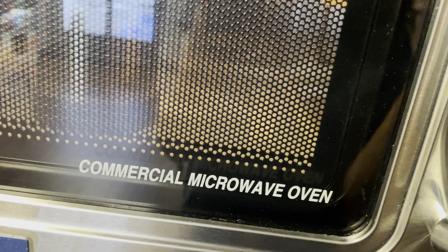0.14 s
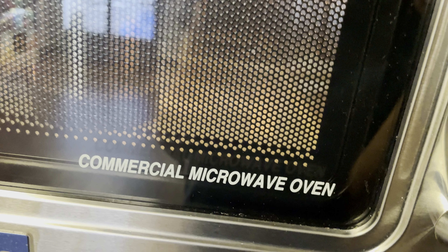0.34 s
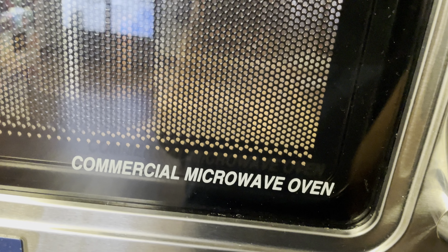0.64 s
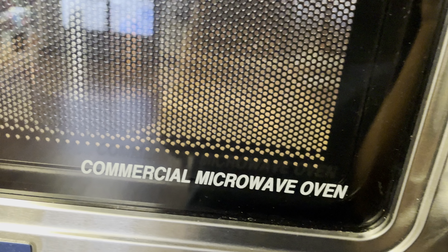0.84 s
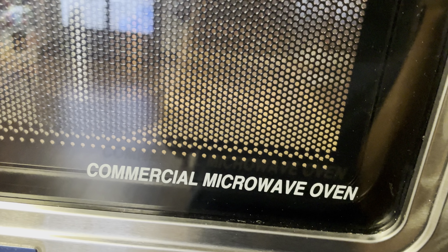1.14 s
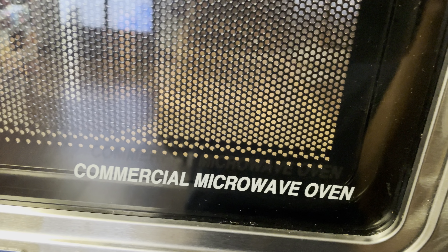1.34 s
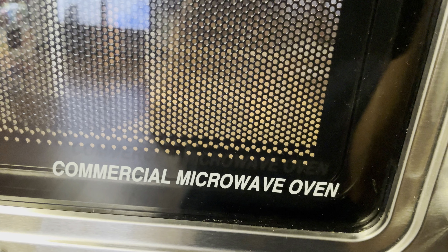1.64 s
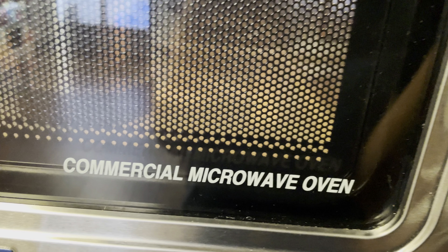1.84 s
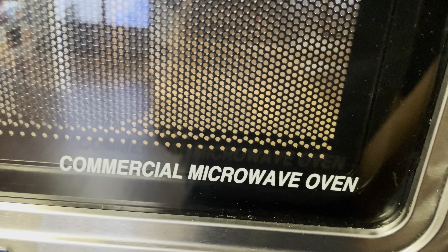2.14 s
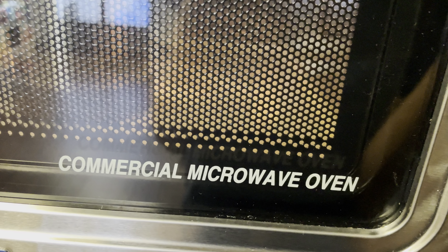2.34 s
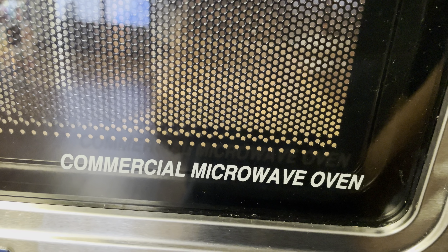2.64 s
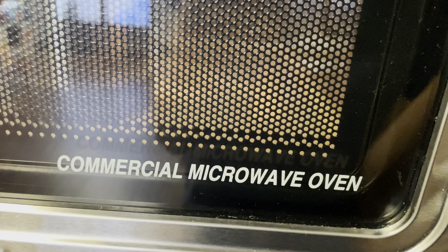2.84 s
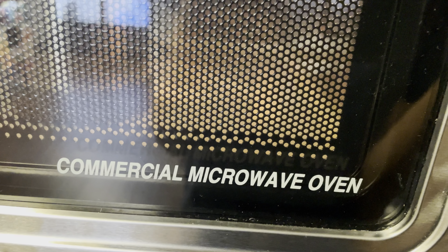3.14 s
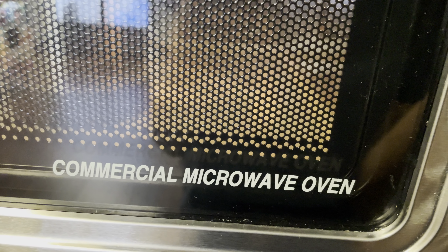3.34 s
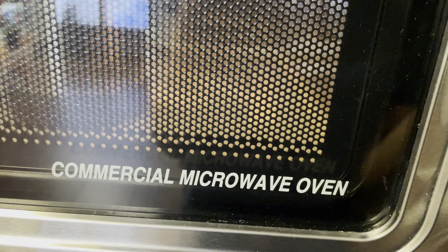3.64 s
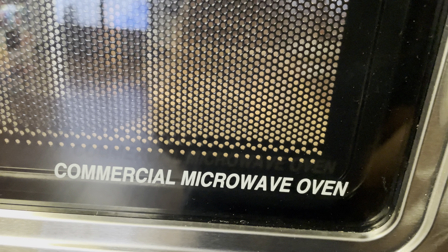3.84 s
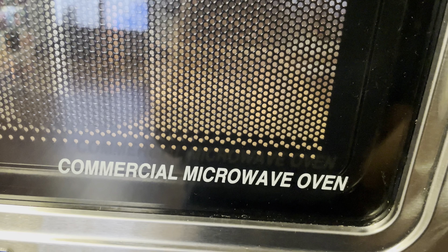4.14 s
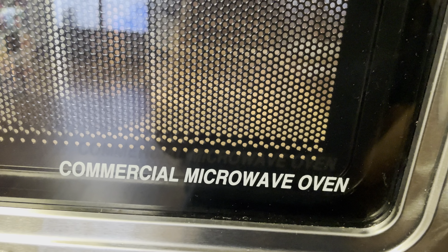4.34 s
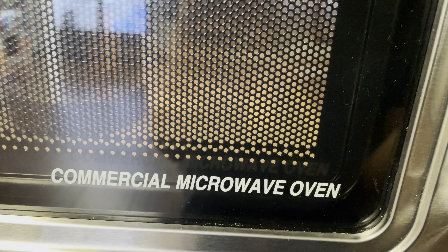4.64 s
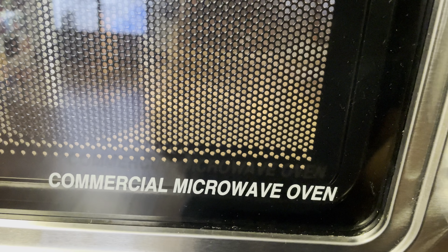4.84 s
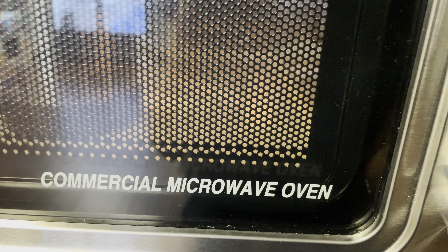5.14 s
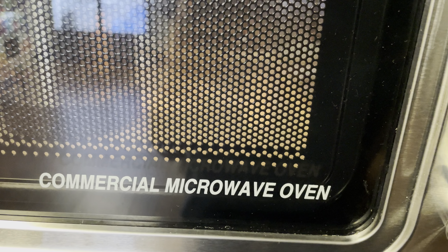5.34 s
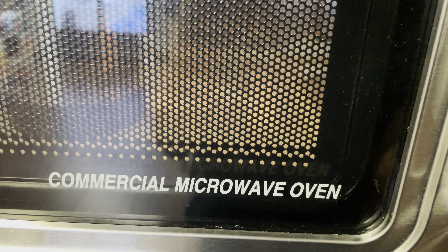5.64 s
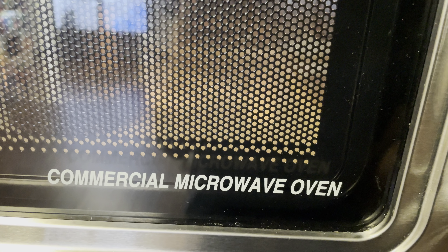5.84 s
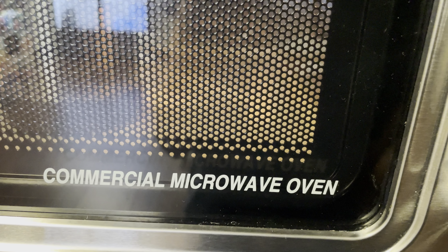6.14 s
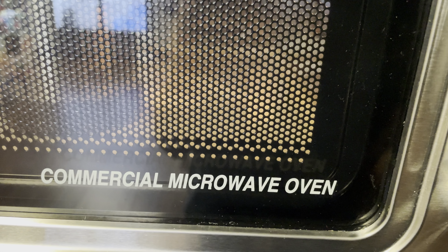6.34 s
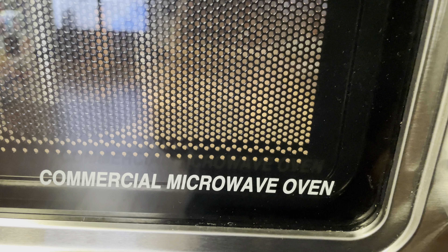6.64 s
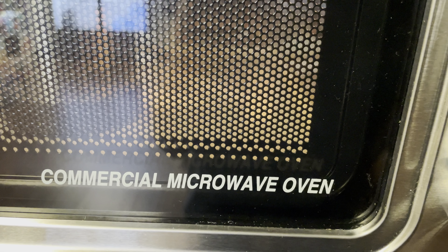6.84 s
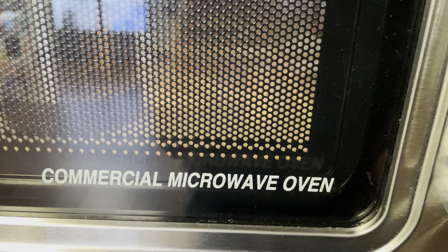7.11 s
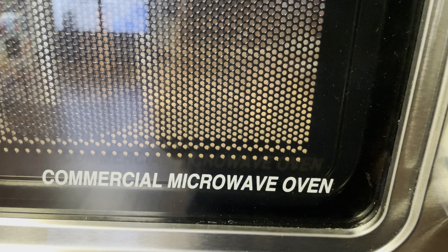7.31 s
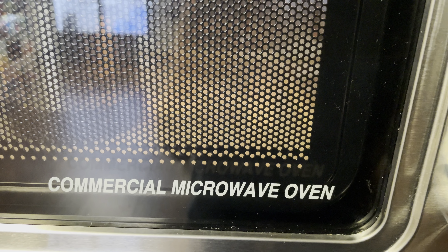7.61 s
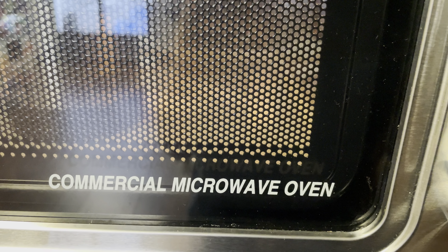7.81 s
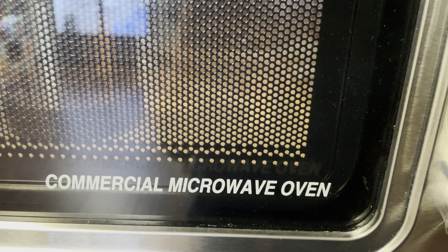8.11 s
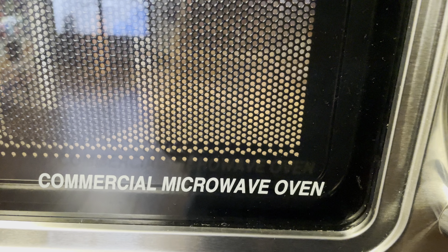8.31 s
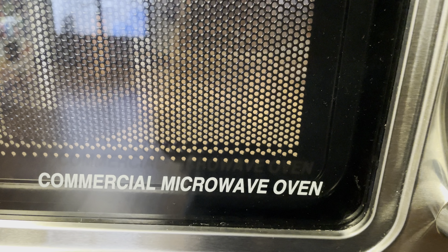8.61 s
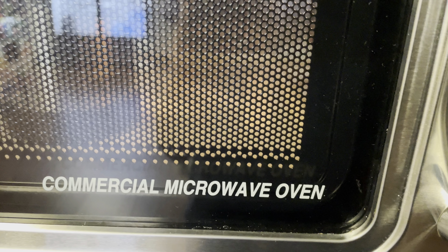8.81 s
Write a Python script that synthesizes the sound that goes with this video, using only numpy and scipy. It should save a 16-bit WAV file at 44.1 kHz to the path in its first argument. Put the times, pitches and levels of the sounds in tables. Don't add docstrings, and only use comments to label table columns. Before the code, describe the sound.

Close to the door of a running commercial microwave in an indoor kitchen, a strong low electrical hum with a faint raspy buzz continues throughout. Fan air rumbles, whirs and softly hisses, pulsing about three times a second. Faint steam puffs and a thin hiss come early, a knock and bubbling snaps near the middle, and a dull metal clank late. Hand-held stereo microphone drifting slightly away.

```python
import sys
import numpy as np
from scipy import signal
from scipy.fft import irfft
from scipy.io import wavfile
from scipy.ndimage import uniform_filter1d

SR = 44100
rng = np.random.default_rng(int(sys.argv[2]) if len(sys.argv) > 2 else 0)


def inscribe(sig):
    pcm = np.round(np.clip(np.atleast_2d(sig).T, -1, 1) * 32767)
    wavfile.write(sys.argv[1], SR, pcm.astype(np.int16))


def linear_from_db(decibels):
    return 10 ** (np.asarray(decibels, float) / 20)


N = 395577
MAINS_HZ = 59.974


def read(points, hz, column=1):
    points = np.array(points, float)
    return np.interp(np.log(hz + 1), np.log(points[:, 0] + 1), points[:, column])


def slow(t, top_hz, count):
    hz = np.geomspace(top_hz / 10, top_hz, 12)[:, None, None]
    waves = np.sin(2 * np.pi * (hz * t + rng.random((12, count, 1)))) / np.sqrt(hz)
    return waves.sum(0) / np.sqrt(np.sum(.5 / hz))


def pan(db):
    return linear_from_db([[.5 * db], [-.5 * db]])


def faster(x):
    return signal.resample_poly(x, 8, 1, axis=1)[:, :N]


# frequency in Hz, likeness from 0 to 1, phase in radians by which
# the left leads, left-right level in dB.
PORT_DIFFERENCE = [(40, .87, 0, 2.5), (300, .72, -.2, 2), (550, .12, -.3, 2), (900, .3, -1.0, 1.2),
                   (1600, .5, -1.5, 2.5), (2200, .45, .2, 3), (3000, .65, 1.0, 4), (3800, .72, .1, 4),
                   (5300, .6, .6, 4), (6600, .65, -1.0, 1.5), (7700, .93, -2.95, 0), (8900, .9, -3.8, 0),
                   (9700, .8, -4.7, 0), (11000, .87, -5.8, 0), (12100, .9, -6.6, 0), (13400, .75, -8.15, 0),
                   (14200, .95, -9.2, 0), (16000, .95, -9.6, 0)]


def pair(a, b, hz):
    same = np.clip(read(PORT_DIFFERENCE, hz), 0, 1)
    phase = read(PORT_DIFFERENCE, hz, column=2)
    level_db = read(PORT_DIFFERENCE, hz, column=3)
    half = np.exp(.5j * phase) * linear_from_db(.5 * level_db)
    right = same * a + np.sqrt(1 - same ** 2) * b
    return np.array([a * half, right / half])


def mains_turns():
    t = np.arange(N) / SR
    coarse = np.arange(0, N / SR + 1, .05)
    bend = .0015 * slow(coarse, .6, count=1)[0]
    return MAINS_HZ * t + np.interp(t, coarse, bend)


# time in seconds, extra echo path in metres.
HAND_DRIFT = [(0, 0.0), (1.5, 0.049), (3, 0.19), (4.5, 0.21), (6, .267), (7.5, 0.4), (8.97, .443)]


def standing(t, k, echo, place):
    sound_m_per_s = 343
    path = np.interp(t, *np.transpose(HAND_DRIFT))
    turns = place + k * MAINS_HZ * path / sound_m_per_s
    gain = abs(1 + np.clip(echo, 0, 1) * np.exp(2j * np.pi * turns))
    return gain / np.sqrt(np.mean(gain ** 2))


# multiple of the mains, level in dB rms, left-right level in dB.
HUM_LINES = [(1, -47.3, 6.1), (2, -28.9, 3.0), (4, -33.1, -0.2), (5, -46.4, 5.7), (6, -35.5, 1.4),
             (7, -58.8, -0.3), (8, -51.0, 3.2), (9, -57.7, 8.8), (10, -50.6, -1.9), (11, -55.7, 7.0),
             (12, -52.3, 5.4), (13, -63.0, -4.8), (14, -63, 12.1), (16, -52.2, -0.9), (20, -62.0, -0.9),
             (22, -63.3, 3.3), (23, -67.0, 4.9), (24, -62.8, 5.1), (26, -57.8, 2.5), (28, -66.9, 5.2),
             (31, -71.7, -1.8)]
HUM_LEADS = [(2, -.05), (4, -.2), (6, -.5), (8, 0), (10, -.5), (12, -1.9), (14, -1.5), (16, 0), (22, .2),
             (26, -.5)]
STANDING_WAVES = [(1, .97, .525), (2, .97, .2), (4, .19, .194), (5, .95, .657), (8, 0.33, 0.9),
                  (10, .9, 0.64), (11, .84, 0.29), (12, .5, 0.29), (16, .12, .4)]


def hum(turns):
    waver_db, spread_rad, lag_rad = 2, 2.03, -.41
    turns = turns[::8]
    t = np.arange(0, N, 8) / SR
    coarse = np.arange(0, N / SR, .05)
    longer = np.arange(0, N / SR + 1, .05)
    waves = {round(k): standing(coarse, round(k), echo, place) for k, echo, place in STANDING_WAVES}
    drifts = slow(longer, 0.515, count=len(HUM_LINES))
    out = np.zeros((2, len(t)))
    for (k, db, pan_db), drift in zip(HUM_LINES, drifts):
        wander = linear_from_db(waver_db * min(k / 8, 1) ** 3 * drift[:len(coarse)])
        change = np.interp(t, coarse, waves.get(k, wander))
        phase = 2 * np.pi * k * turns + spread_rad * k * k + lag_rad
        lead = read(HUM_LEADS, k)
        tones = np.array([np.cos(phase + .5 * lead), np.cos(phase - .5 * lead)])
        out += linear_from_db(db) * pan(pan_db) * change * tones
    return np.sqrt(2) * faster(out)


# frequency in Hz, level of each even mains multiple in dB rms,
# odd multiples over even in dB.
SHEET_BUZZ = [(1000, -66, -4), (1800, -72, 0), (2200, -78, -5), (3200, -81, 3), (4500, -93, 4),
              (5600, -93, 8), (6500, -95, 6), (7400, -83, 3), (8200, -82, 0), (8520, -72, -14),
              (8800, -83, -6), (10750, -95, 3), (10975, -88, 8), (11150, -96, 3), (14000, -103, 0)]


def buzz(turns):
    scatter_db, loose_turns, fade_turns_per_s = 2.5, .75, 0.057
    size = 4094
    k = np.arange(2048)
    hz = k * MAINS_HZ
    odd_db = read(SHEET_BUZZ, hz, column=2) * (k % 2)
    level = linear_from_db(read(SHEET_BUZZ, hz) + odd_db + scatter_db * rng.standard_normal(len(k)))
    level *= (hz > 1000) & (hz < 15000) & ~np.isin(k, np.round(np.transpose(HUM_LINES)[0]))
    place = (turns % 1) * size
    t = np.arange(N) / SR
    out = np.zeros((2, N))
    for version in range(3):
        start = loose_turns * rng.random((2, len(k))) + version / 3
        a, b = np.exp(2j * np.pi * start)
        cycle = irfft(pair(a, b, hz) * level) * size / np.sqrt(2)
        rattle = np.array([np.interp(place, np.arange(size + 1), np.append(c, c[0])) for c in cycle])
        share = np.sqrt(2 / 3) * np.cos(np.pi * (fade_turns_per_s * t + version / 3))
        out += share * rattle
    return out


# frequency in Hz, level in dB rms, left-right level in dB.
MOTOR_TONES = [(35.0, -57.5, 2.7), (69.2, -57.0, 4.8), (69.9, -53.3, 5.9), (91.8, -57.1, 2.5),
               (95.1, -56.3, -2.5), (112.6, -43.1, 3.3), (124.5, -53.4, 6.1), (148.1, -54.2, -10.5),
               (176.3, -54.4, 4.1), (190.2, -51.5, 2.0), (216.7, -54.4, 0.2), (225.2, -48.6, 0.8),
               (241.6, -50.8, 0.1), (249.0, -54.2, 7.6), (257.5, -45.6, 5.8), (268.1, -55.9, -0.4),
               (285.1, -57.6, -0.3), (296.2, -55.7, 4.9), (337.8, -53.0, 6.6), (388.0, -57.2, 12.2),
               (570.6, -54.4, 3.3), (380.4, -60.1, -5.8), (450.8, -57, -2)]


def motors():
    waver_db, wobble_rad = 1.5, .4
    t = np.arange(0, N, 8) / SR
    coarse = np.arange(0, N / SR + 1, .05)
    count = len(MOTOR_TONES)
    levels, phases = slow(coarse, 0.75, count=2 * count).reshape(2, count, -1)
    out = np.zeros((2, len(t)))
    for (hz, db, pan_db), level, phase, start in zip(MOTOR_TONES, levels, phases, rng.random(count)):
        wobble = np.interp(t, coarse, wobble_rad * phase)
        tone = np.cos(2 * np.pi * (hz * t + start) + wobble)
        out += np.interp(t, coarse, linear_from_db(db + waver_db * level)) * tone * pan(pan_db)
    return np.sqrt(2) * faster(out)


def shaft(turns):
    slip_hz, dip_s, db, pan_db = 1.39, 4.6, -43.8, 3.2
    t = np.arange(N) / SR
    tone = np.cos(2 * np.pi * (turns - slip_hz * (t - dip_s)) + 1.5 * np.pi)
    return np.sqrt(2) * linear_from_db(db) * tone * pan(pan_db)


def stirrer(t):
    passes_per_s, first_s, depth_db = 3.03, .0, 1.0
    passes = np.exp(1.6 * (np.cos(2 * np.pi * passes_per_s * (t - first_s)) - 1))
    uneven = 1 + .25 * slow(t, .6, count=1)
    return depth_db * uneven * 3 * (passes - passes.mean())


def air(points, size, patchy_db, swell_db, throb):
    hop = size // 4
    frames = N // hop + 5
    hz = np.fft.rfftfreq(size, 1 / SR)
    t = np.arange(frames) * hop / SR
    a, b, c, d, patches = rng.standard_normal((frames, len(hz), 5)).T
    patches = uniform_filter1d(uniform_filter1d(patches, 12, 0), 12, 1) * 12
    inside = (hz >= points[0][0]) & (hz < points[-1][0])
    db = read(points, hz)[:, None] + patchy_db * patches
    db = db + swell_db * slow(t, 3, count=1) + throb * stirrer(t)
    z = pair(a + 1j * b, c + 1j * d, hz[:, None]) * linear_from_db(db) * inside[:, None]
    x = signal.istft(z, nperseg=size, noverlap=size - hop)[1][:, :N]
    return x * np.sqrt(1.5 * SR / size)


# frequency in Hz, level in dB per Hz.
RUMBLE_SPECTRUM = [(25, -80), (38, -73), (52, -61.5), (68, -66), (90, -66), (140, -67), (170, -62.5),
                   (250, -61), (300, -66), (345, -64), (420, -69)]
# frequency in Hz, level in dB per Hz.
WHIR_SPECTRUM = [(480, -69), (620, -67), (740, -70), (850, -77), (960, -66), (1030, -68.5), (1090, -73),
                 (1170, -71.5), (1250, -78), (1330, -71.5), (1420, -77.5), (1520, -71.5), (1650, -78),
                 (1900, -82)]
# frequency in Hz, level in dB per Hz.
HISS_SPECTRUM = [(2300, -84.5), (3050, -85), (3400, -90), (4500, -95), (5600, -99), (6800, -100.5),
                 (7600, -102.5), (8500, -103), (9300, -104.5), (10300, -107.5), (11500, -109),
                 (13000, -113.5), (14500, -112), (15600, -113)]


def fan_air():
    low = RUMBLE_SPECTRUM + WHIR_SPECTRUM[:1]
    middle = WHIR_SPECTRUM + HISS_SPECTRUM[:1]
    high = HISS_SPECTRUM + [(17000, -116)]
    rumble = air(low, size=4096, patchy_db=.5, swell_db=.5, throb=0.11)
    whir = air(middle, size=2048, patchy_db=1.02, swell_db=0.46, throb=0.38)
    hiss = air(high, size=512, patchy_db=0.96, swell_db=.5, throb=0.68)
    return rumble + whir + hiss


def burst(s, db, hz, width, rise, hold, t60, size=1 << 15):
    t = np.arange(size) / SR
    f = np.fft.rfftfreq(size, 1 / SR)
    a, b, c, d = rng.standard_normal((4, len(f)))
    band = np.exp(-2 * ((f - hz) / width) ** 2)
    x = irfft(pair(a + 1j * b, c + 1j * d, f) * band)
    x[1] += .6 * np.roll(x[1], 300)
    tail = linear_from_db(-60 * np.maximum(t - rise - hold, 0) / t60)
    shape = np.clip(t / rise, 0, 1) * tail
    return s, linear_from_db(db) * shape * x / x.std()


# start in seconds, level in dB rms, centre in Hz.
STEAM_PUFFS = [
    (0.0, -50, 7000),
    (1.32, -60, 8000),
    (5.92, -67, 6500),
    (7.232, -66, 8500),
]


def puffs():
    for s, db, hz in STEAM_PUFFS:
        yield burst(s, db, hz, width=.9 * hz, rise=0.0022, hold=0.0096, t60=.17)


# start in seconds, level in dB rms, centre in Hz, t60 in seconds.
STEEL_RINGS = [
    (.03, -45.5, 1890, .6),
    (6.445, -39.5, 715, .25),
]


def rings():
    for s, db, hz, t60 in STEEL_RINGS:
        yield burst(s, db, hz, width=0.18 * hz, rise=0.014, hold=0.043, t60=t60)


# start in seconds, level in dB rms, centre in Hz.
ROOM_KNOCKS = [
    (.690, -37, 1000),
    (3.438, -38, 1000),
]


def knocks():
    for s, db, hz in ROOM_KNOCKS:
        yield burst(s, db, hz, width=900, rise=.001, hold=.002, t60=.025)


def steam_jet():
    start_s, db, hz, length_s = 1.82, -68.5, 6600, .89
    width_hz, rise_s, t60_s, chuff_db = 500, .04, .12, 3.5
    yield burst(start_s, db, hz, width_hz, rise_s, length_s - rise_s, t60_s, size=1 << 16)
    yield burst(start_s + length_s, db + chuff_db, hz, 1.5 * width_hz, 0.0022, 0.0096, t60_s)


# start in seconds, level in dB rms, centre in Hz,
# hold in seconds, level of the fizz on top in dB rms.
BUBBLE_SPITS = [
    (3.434, -54, 10000, .018, -63),
    (3.713, -54, 7000, .012, -54),
    (4.278, -48, 4200, .0012, -59),
]


def spits():
    rise_s = .001
    for s, db, hz, hold, fizz_db in BUBBLE_SPITS:
        tail = .012 + 4.6 * hold
        yield burst(s, db, hz, .5 * hz, rise_s, hold, tail)
        yield burst(s, fizz_db, 14500, 4800, rise_s, hold, .75 * tail)


def add(mix, s, sound):
    part = mix[:, round(max(s, 0) * SR):][:, :sound.shape[1]]
    part += sound[:, :part.shape[1]]


def scene():
    turns = mains_turns()
    mix = hum(turns) + buzz(turns) + motors() + shaft(turns) + fan_air()
    for s, sound in [*puffs(), *rings(), *knocks(), *steam_jet(), *spits()]:
        add(mix, s, sound)
    return mix


def top_cut(x):
    return signal.sosfilt(signal.butter(12, 15750, fs=SR, output="sos"), x)


def record(dry):
    to_edge = np.minimum(np.arange(N), N - np.arange(N))
    fade = np.clip(to_edge / 200, 0, 1)
    return top_cut(dry * fade)


dry = scene()
out = record(dry)
inscribe(out)
```